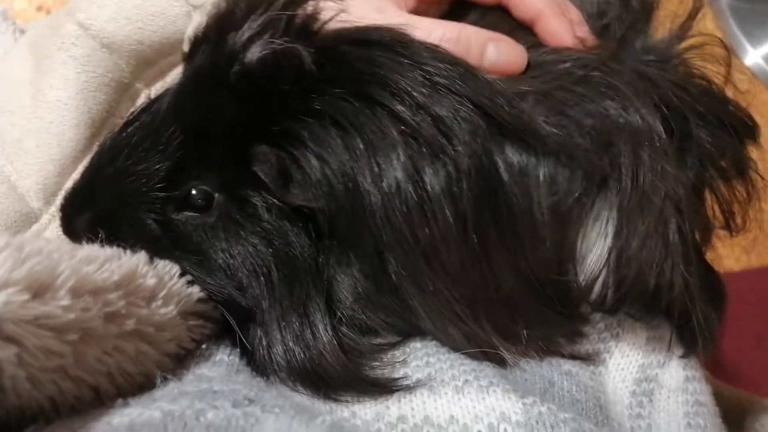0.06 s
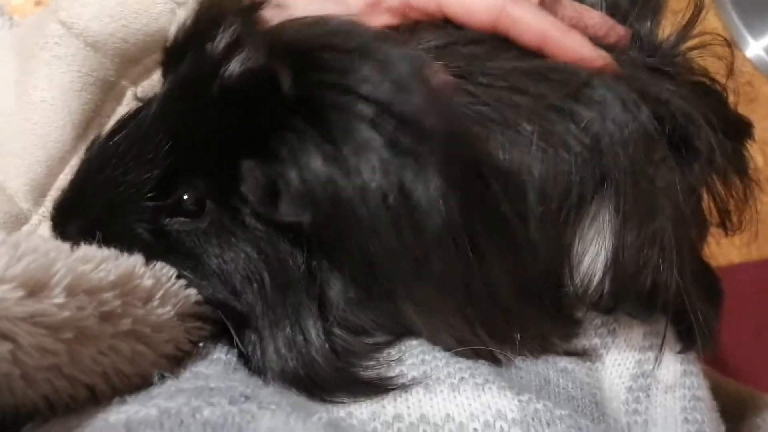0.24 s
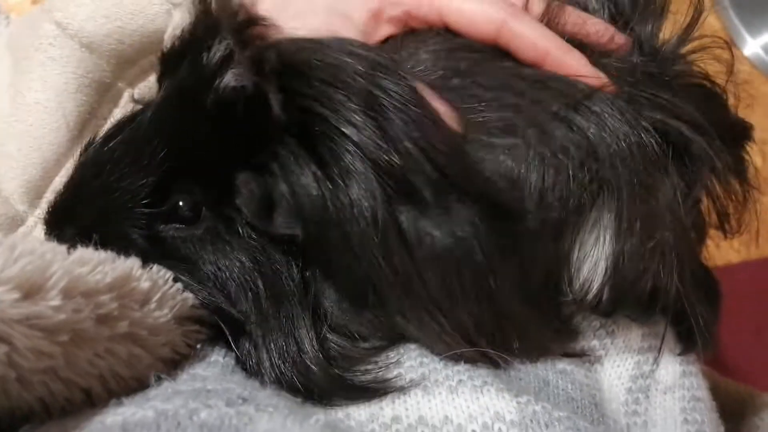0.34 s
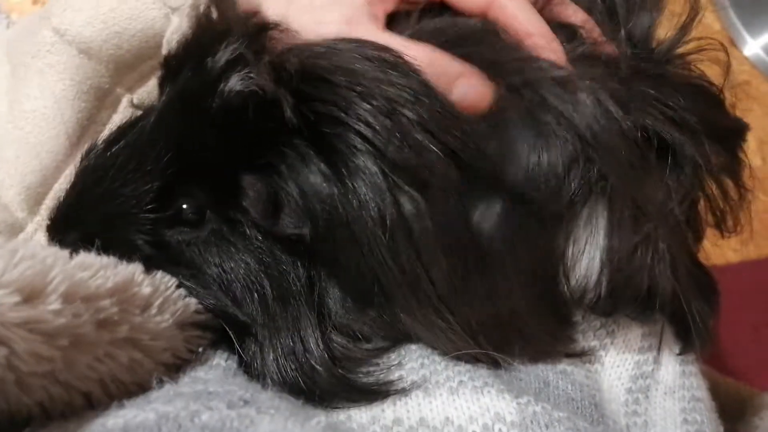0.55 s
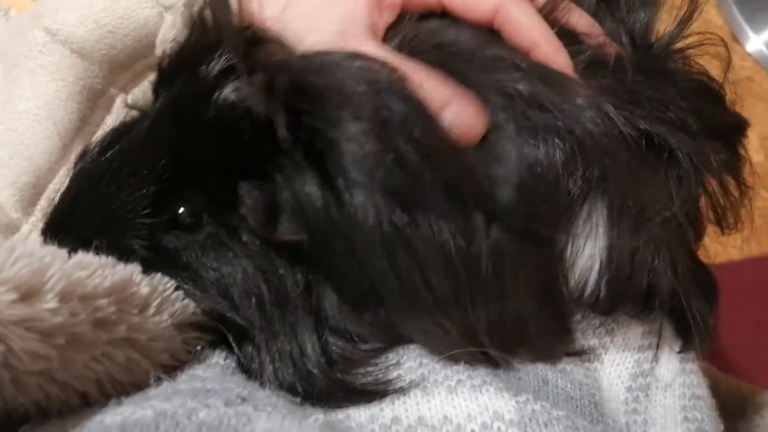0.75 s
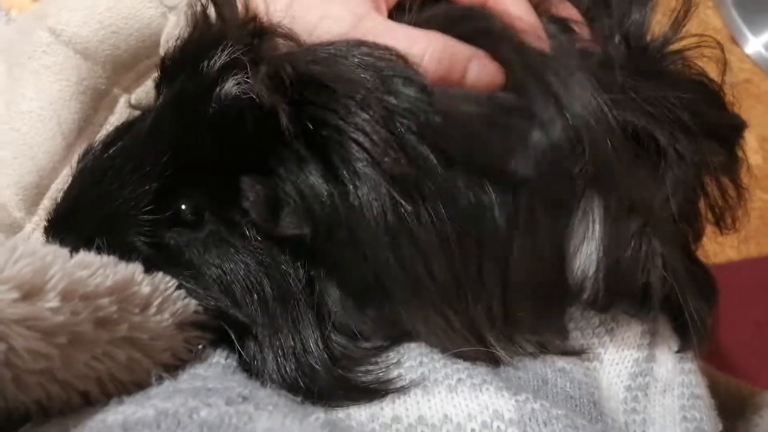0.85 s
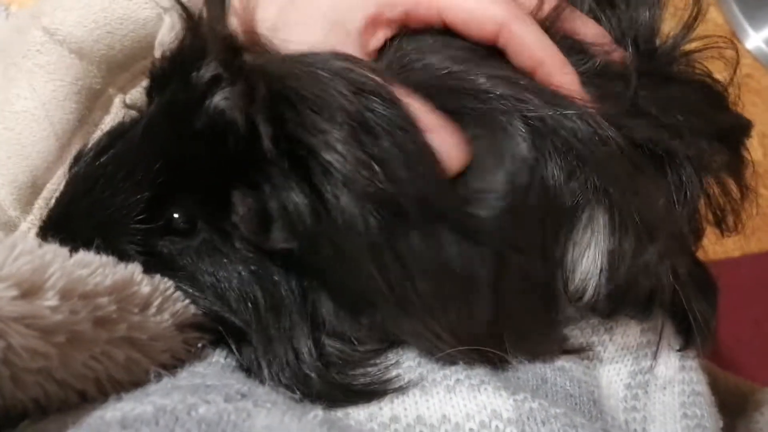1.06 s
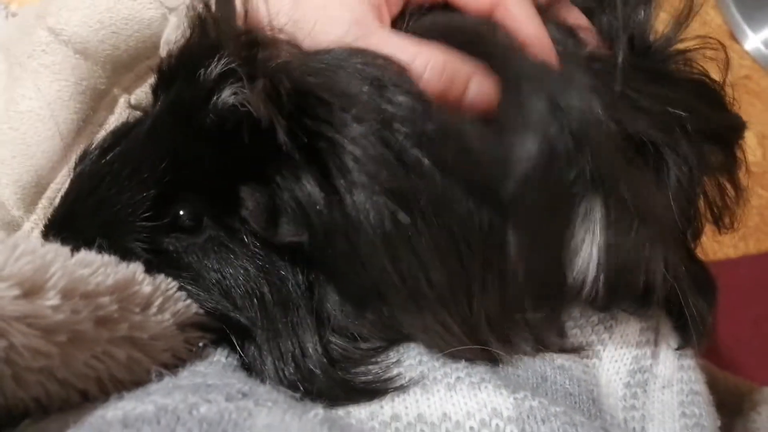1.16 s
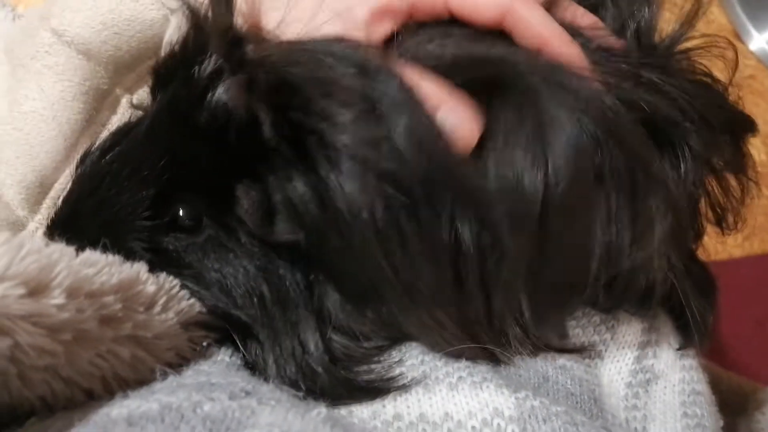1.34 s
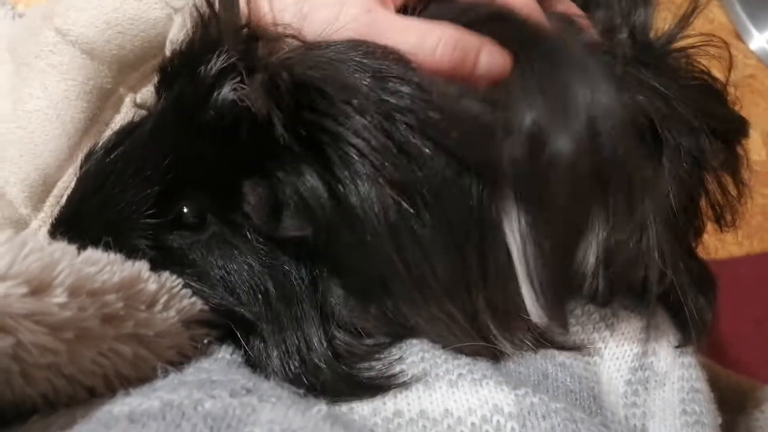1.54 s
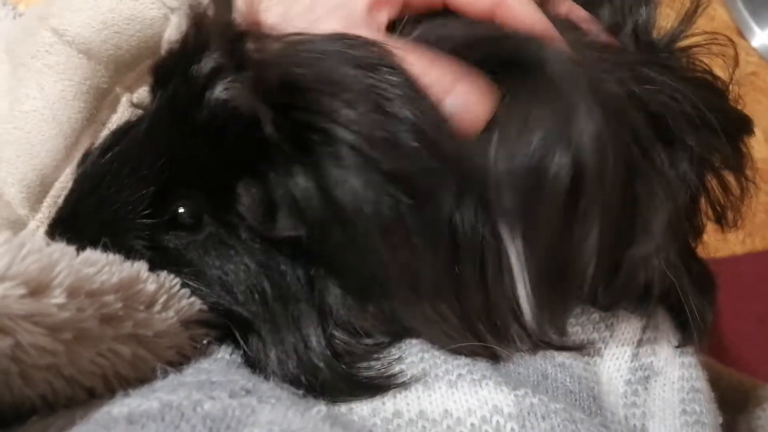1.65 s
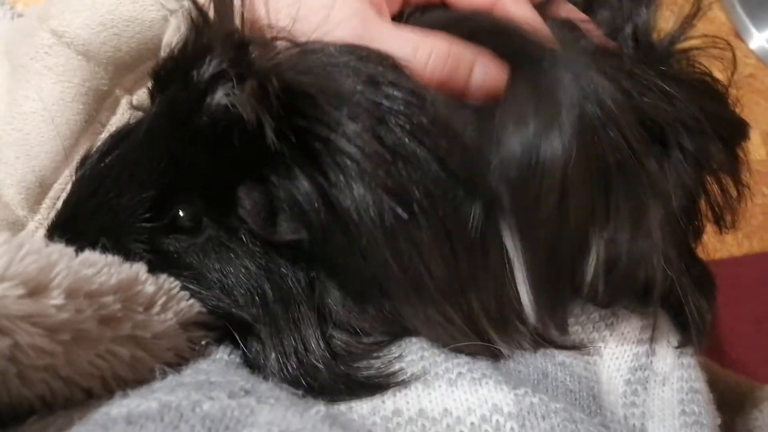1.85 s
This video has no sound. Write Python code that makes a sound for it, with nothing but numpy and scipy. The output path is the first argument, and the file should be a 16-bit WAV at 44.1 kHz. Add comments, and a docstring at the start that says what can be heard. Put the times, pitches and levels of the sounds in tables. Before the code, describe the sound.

A guinea pig grumbles three times in short, low, wavering calls over faint hiss.

```python
"""A guinea pig, stroked on a lap close to the microphone, grumbles three times.
Each phrase: short lead-in notes, a long wavering call, a soft closing grunt. The voice is a nearly
pure tone shaped by the throat; in places it breaks into a rasp of slower, uneven flaps.
The hand adds soft low bumps. A small furnished room answers faintly, over hiss, rumble and mains hum."""
import sys
import numpy as np
from scipy import signal
from scipy.fft import rfft, irfft, next_fast_len
from scipy.io import wavfile
from scipy.ndimage import uniform_filter1d, map_coordinates

SR = 44100
rng = np.random.default_rng(int(sys.argv[2]) if len(sys.argv) > 2 else 0)


def wav_record(signal):
    """Record a signal, one row per channel, as 16-bit PCM in the file named by sys.argv[1]."""
    frames = np.transpose(np.atleast_2d(signal))
    bounded = np.clip(frames, -1, 1)
    # unit amplitude maps onto the largest positive 16-bit level
    quanta = np.round(bounded * 32767).astype(np.int16)
    wavfile.write(sys.argv[1], SR, quanta)


N = 83790

# Long calls: (time [s], pitch [Hz], level [dB], rasp [0-1])
FIRST_CALL = [(.244, 513, -47, 0.1), (.258, 569.3, -48.5, 0.09), (.288, 436.5, -43.5, 0.1),
              (.305, 420, -42, 0), (.325, 454.2, -44, 0.3), (.333, 297.4, -42.5, .54),
              (.341, 454, -43, 0.6), (.352, 521.7, -44, .28), (.367, 436.3, -41.5, 0.29),
              (.376, 297.8, -43, 0.69), (.384, 371, -43, 0.59), (.394, 428.6, -40.5, .28),
              (.405, 449, -40.5, 0.05), (.411, 417, -41.5, 0.2)]
SECOND_CALL = [(.784, 661.7, -50, 0), (.803, 535.3, -45.5, 0.41), (.818, 407.5, -45.5, 0.78),
               (0.828, 462, -43, 0.7), (.841, 451.6, -45, 0.87), (.854, 323.4, -46, 0.83),
               (.86, 403, -48.5, 0.96), (0.868, 486, -44, 0.64), (0.876, 601.7, -44.5, 0.028),
               (0.888, 463.4, -43.5, 0.62), (0.896, 412.3, -48, 1), (.918, 552.5, -45.5, 1),
               (.939, 528, -47.5, 1), (.951, 597, -45.5, 0.58), (0.965, 545, -44, 0.13),
               (0.984, 459, -53.5, 0.089)]
THIRD_CALL = [(1.404, 786.6, -49.5, 0.04), (1.415, 772, -54, 0.03), (1.426, 560.5, -47.5, 0.012),
              (1.46, 416.6, -43, 0), (1.475, 439, -42, 0), (1.483, 433.6, -40.5, 0.34),
              (1.5, 593, -44.5, 0.23), (1.517, 752.3, -46.5, .04), (1.535, 572.6, -44.5, .08),
              (1.556, 424.6, -40, 0.2), (1.566, 386, -42, 0.18)]
# Short notes: (start [s], length [s], first, middle, last pitch [Hz], level [dB], rasp [0-1])
SHORT_NOTES = [(.186, .0063, 324, 319, 298, -58.5, 0.04), (.2, 0.026, 451, 528.6, 588, -52.5, 0.44),
               (.233, 0.0012, 493, 418, 362, -55, 0.68), (0.42, 0.0022, 414, 401, 391, -51.5, 0),
               (0.459, .018, 332, 294, 306, -53.5, 0), (.722, 0.0027, 384, 362, 350, -57, 0),
               (0.737, 0.016, 514, 579, 485, -51.5, 0.41), (1.021, 0.02, 456, 436, 400, -60.5, 0.15),
               (1.337, .037, 373, 604, 620, -51.5, 0.3), (1.381, 0.00051, 615, 618, 596, -47.5, .08),
               (1.616, 0.0035, 409, 378, 363, -45.5, 0.14), (1.624, 0.017, 357, 312, 304, -53, 0.35)]
# Harmonics 1-6 ahead of the throat: (relative level [dB])
HARMONICS_DB = [1.5, -8, -15, -20, -30, -26]
# Throat response to the tone and to the flaps: (frequency [Hz], gain [dB])
THROAT_RESPONSE = [(100, -13), (300, 5), (600, -3), (870, -5), (1100, -2.5), (1350, -7), (1750, -22.5),
                   (1980, -19), (2200, -7.5), (2400, -20), (2900, -21.5), (3600, -32), (8000, -64)]
RASP_RESPONSE = [(80, -24.5), (140, -19.5), (215, -4.5), (310, 5), (460, -3), (650, -1), (900, -10.5),
                 (1130, -8), (1370, -15), (1750, -32.5), (2350, -24), (2900, -30.5), (3350, -53),
                 (8000, -74.5)]
# Noise spectra: (frequency [Hz], relative density [dB])
HISS_SPECTRUM = [(76, -45.5), (130, -5), (182, -6), (247, -6), (283, -5.5), (494, -13), (557, -12),
                 (637, -13.5), (3460, -22.5), (7400, -29.5), (9620, -73), (16300, -120)]
RUMBLE_SPECTRUM = [(10, -13), (35, 2), (50, -1.5), (72, 0.5), (110, -8), (140, -21), (250, -47.5)]
BUMP_SPECTRUM = [(20, -30), (55, -7), (78, -2), (105, -6), (150, -18), (300, -50)]
HOARSE_SPECTRUM = [(200, -40.5), (600, 1.5), (1300, 0), (1800, -6), (2170, 2.5), (2450, -6), (2900, -13),
                   (3500, -32), (8000, -55)]
# Hand bumps: (centre time [s], Gaussian sigma [s], level [dB])
HAND_BUMPS = [(.2, 0.074, -73.5), (.86, .08, -66), (1.77, 0.082, -69.5)]
# Room decay: (frequency [Hz], T60 [s])
ROOM_DECAY = [(200, .34), (600, 0.27), (3000, 0.13)]

HISS_DB, RUMBLE_DB, RUMBLE_SWELL_DB, HUM_HZ, HUM_DB = -73, -74, 1.5, 100, -80
ATTACK_S, RELEASE_S, LEVELLING_S = .003, .0061, .009
SHIMMER_DB, JITTER, RASP_JITTER = .4, .007, .085
FULL_VOICE_DB, BRIGHTEN_DB_PER_DB = -45.5, .28
PRESS_DB_PER_S, PRESS_PIVOT_S, PRESS_ABOVE_HZ = 60, .11, 1700
HOARSE_DB, HOARSE_DB_PER_DB = -29.5, .9
FLAP_HZ, FLAP_JITTER, FLAP_SPREAD_DB, AIR_DB = 215, .11, 1, -3.5
BODY_CUT_HZ, ROOM_DB = 140, -17.5
TREBLE_CUT_HZ, SELF_NOISE_DB, SELF_NOISE_TOP_HZ = 7500, -98, 15800


def amp(db):
    """Decibels to gain."""
    return 10 ** (np.asarray(db) / 20)


def unit_rms(x):
    """Scale to rms 1."""
    return x / np.sqrt(np.mean(x ** 2) + 1e-20)


def along(points, hz):
    """Interpolate (frequency [Hz], value) points on a log axis."""
    knot_hz, values = np.transpose(points)
    return np.interp(np.log(hz + 1), np.log(knot_hz + 1), values)


def wobble(knots_per_s):
    """Smooth random curve."""
    knots = rng.standard_normal(int(N * knots_per_s / SR) + 4)
    return map_coordinates(knots, [np.arange(N) * knots_per_s / SR])


def filtered(x, gain):
    """Zero-phase filter with response gain(hz)."""
    size = next_fast_len(N + SR // 2)
    return irfft(rfft(x, size) * gain(np.fft.rfftfreq(size, 1 / SR)), size)[:N]


def noise(spectrum):
    """Coloured noise, rms 1."""
    return unit_rms(filtered(rng.standard_normal(N), lambda hz: amp(along(spectrum, hz))))


def resonate(x, response, size=4096):
    """Ring x through a minimum-phase filter."""
    cepstrum = irfft(np.log(amp(along(response, np.fft.rfftfreq(size, 1 / SR)))))
    cepstrum[1:size // 2] *= 2
    cepstrum[size // 2 + 1:] = 0
    return signal.fftconvolve(x, irfft(np.exp(rfft(cepstrum))))[:N]


def background():
    """Steady hiss, gently swelling rumble, faint mains hum."""
    hiss = amp(HISS_DB) * noise(HISS_SPECTRUM)
    rumble = amp(RUMBLE_DB + RUMBLE_SWELL_DB * wobble(8)) * noise(RUMBLE_SPECTRUM)
    hum = amp(HUM_DB) * unit_rms(np.sin(2 * np.pi * HUM_HZ * np.arange(N) / SR))
    return hiss + rumble + hum


def stroking_hand():
    """Dull bass swells as the hand presses on the fur."""
    t = np.arange(N) / SR
    swells = sum(amp(db) * np.exp(-.5 * ((t - at_s) / sigma_s) ** 2) for at_s, sigma_s, db in HAND_BUMPS)
    return swells * noise(BUMP_SPECTRUM)


def throat_tone(hz, age_s, effort_db):
    """Throat-shaped harmonics, rms 1; the upper ones grow with effort and as the animal presses on."""
    k = np.arange(1, len(HARMONICS_DB) + 1)[:, None]
    press_db = PRESS_DB_PER_S * (age_s - PRESS_PIVOT_S) * (k * hz > PRESS_ABOVE_HZ)
    brighten_db = BRIGHTEN_DB_PER_DB * (k - 1) * effort_db
    gains = amp(np.array(HARMONICS_DB)[:, None] + along(THROAT_RESPONSE, k * hz) + press_db + brighten_db)
    phase = 2 * np.pi * np.cumsum(hz) / SR
    return -(gains * np.cos(k * phase)).sum(0) / np.sqrt((gains ** 2).sum(0) / 2)


def rasp_pulses():
    """Slow uneven flaps and turbulence ring the throat."""
    cycles = np.cumsum(FLAP_HZ * np.exp(FLAP_JITTER * wobble(200))) / SR
    pulses = np.diff(np.floor(cycles), prepend=0) * amp(-FLAP_SPREAD_DB * rng.standard_normal(N))
    air = amp(AIR_DB) * rng.standard_normal(N)
    return unit_rms(resonate(unit_rms(pulses) + air, RASP_RESPONSE))


def voice(start_s, end_s, pitch_hz, level_db, rasp):
    """One note. Rasp unsettles the pitch, then breaks the tone into flaps; effort adds turbulence."""
    t = np.arange(N) / SR
    on = (t > start_s - ATTACK_S) & (t < end_s + 2 * RELEASE_S)
    rasp = np.clip(rasp, 0, 1)
    effort_db = np.broadcast_to(level_db - FULL_VOICE_DB, N)
    hz = pitch_hz * np.exp((JITTER + RASP_JITTER * rasp) * wobble(350))
    tone = np.zeros(N)
    tone[on] = throat_tone(hz[on], t[on] - start_s, effort_db[on])
    flap_mix = rasp ** 2
    source = np.sqrt(1 - flap_mix ** 2) * tone + flap_mix * rasp_pulses()
    window = np.hanning(round(2 * LEVELLING_S * SR))
    power = signal.fftconvolve(np.where(on, source ** 2, 1), window / window.sum(), "same")
    hoarse_db = FULL_VOICE_DB + HOARSE_DB + HOARSE_DB_PER_DB * effort_db
    hoarse = amp(hoarse_db) * np.maximum(-tone, 0) * noise(HOARSE_SPECTRUM)  # pulsed by the tone
    voiced = amp(level_db + SHIMMER_DB * wobble(150)) * source / np.sqrt(np.abs(power) + 1e-6)
    gate = np.clip((t - start_s) / ATTACK_S + .5, 0, 1) * np.clip((end_s - t) / RELEASE_S + 1, 0, 1)
    return np.sin(gate * np.pi / 2) ** 2 * (voiced + hoarse)


def guinea_pig():
    """Three wavering calls with short gliding notes round them; the small body radiates little bass."""
    t, out = np.arange(N) / SR, np.zeros(N)
    for call in (FIRST_CALL, SECOND_CALL, THIRD_CALL):
        times_s, *columns = np.transpose(call)
        pitch_hz, level_db, rasp = [uniform_filter1d(np.interp(t, times_s, c), size=300) for c in columns]
        out += voice(times_s[0], times_s[-1], pitch_hz, level_db, rasp)
    for start_s, length_s, first_hz, middle_hz, last_hz, level_db, rasp in SHORT_NOTES:
        u = np.clip(2 * (t - start_s) / length_s - 1, -1, 1)
        bend_hz = (first_hz + last_hz) / 2 - middle_hz
        pitch_hz = middle_hz + u * (last_hz - first_hz) / 2 + u ** 2 * bend_hz
        out += voice(start_s, start_s + length_s, pitch_hz, level_db, rasp)
    return filtered(out, lambda hz: 1 / np.sqrt(1 + (BODY_CUT_HZ / (hz + 1)) ** 12))


def room(x):
    """Short diffuse tail; treble dies first."""
    hz, t, spectra = signal.stft(rng.standard_normal(SR // 2), SR, nperseg=256)
    decay = amp(-60 * t / along(ROOM_DECAY, hz)[:, None])
    tail = signal.istft(spectra * decay, SR, nperseg=256)[1]
    return signal.fftconvolve(x, tail / np.linalg.norm(tail))[:N]


def scene():
    """Animal, room, hand and background; mono."""
    animal = guinea_pig()
    return (animal + amp(ROOM_DB) * room(animal) + stroking_hand() + background())[None]


def record(dry):
    """Steep treble cut plus a trace of recorder self-noise."""
    dulled = filtered(dry[0], lambda hz: 1 / np.sqrt(1 + (hz / TREBLE_CUT_HZ) ** 80))
    self_noise = amp(SELF_NOISE_DB) * rng.standard_normal(N)
    return filtered(dulled + self_noise, lambda hz: hz < SELF_NOISE_TOP_HZ)[None]


dry = scene()
out = record(dry)
wav_record(out)
```